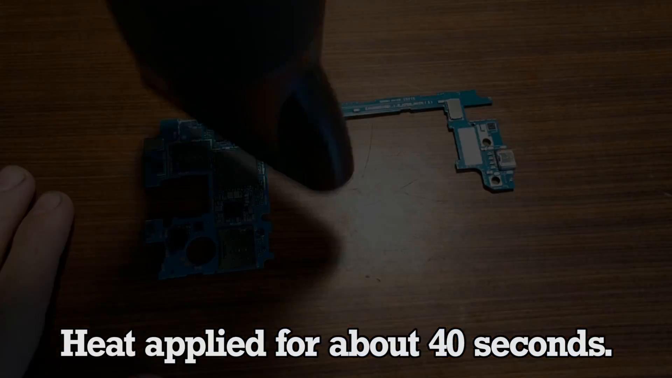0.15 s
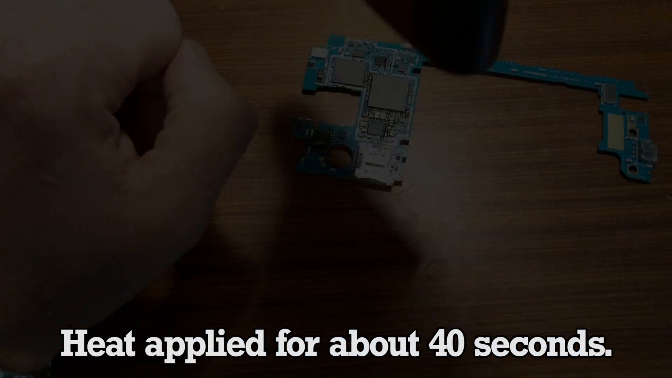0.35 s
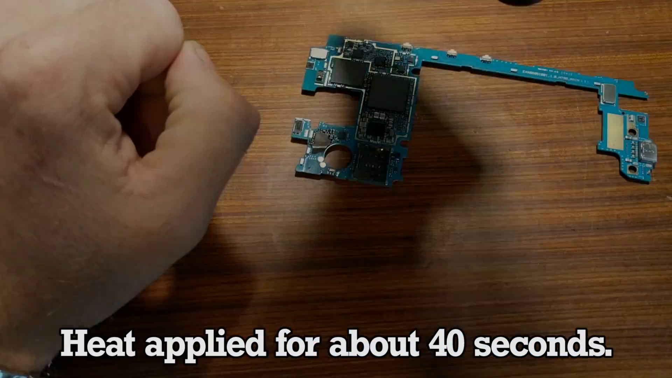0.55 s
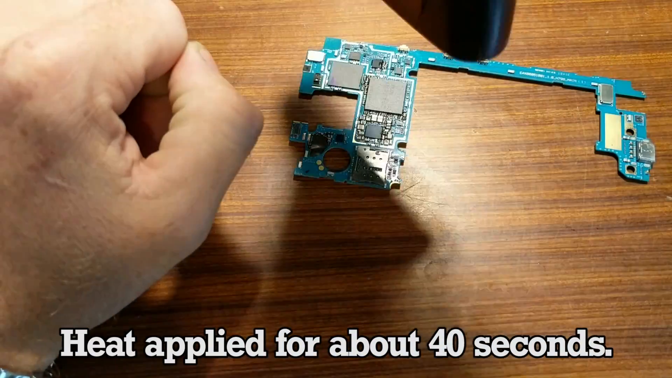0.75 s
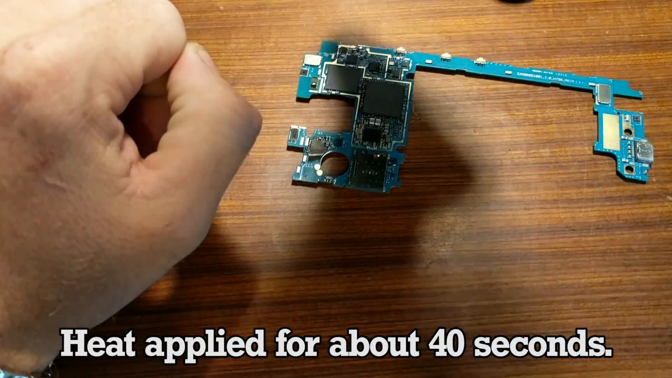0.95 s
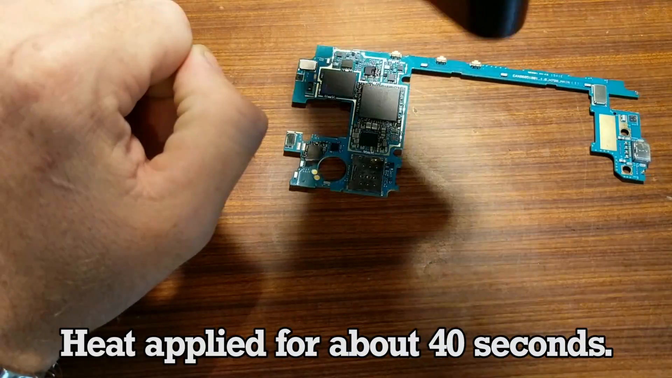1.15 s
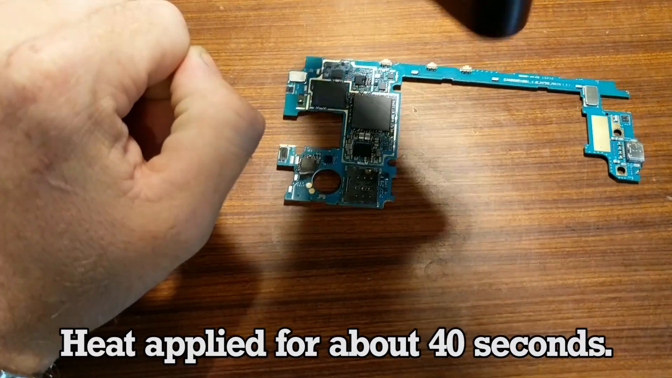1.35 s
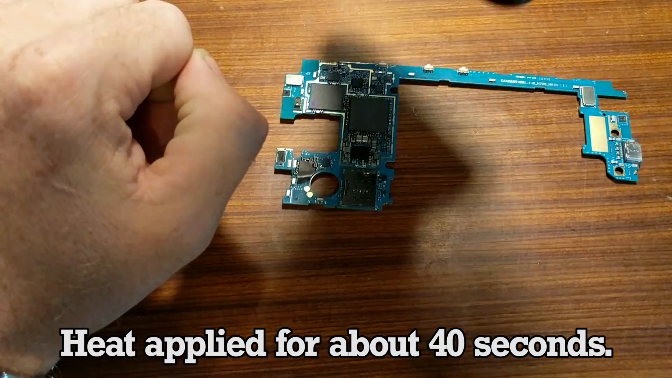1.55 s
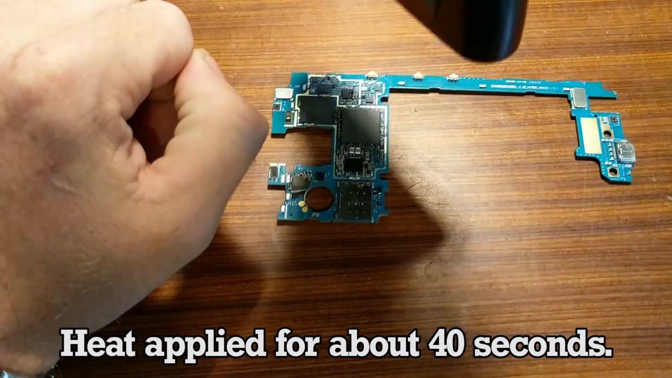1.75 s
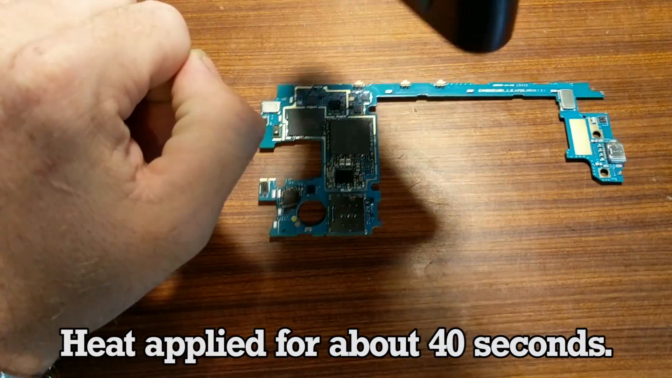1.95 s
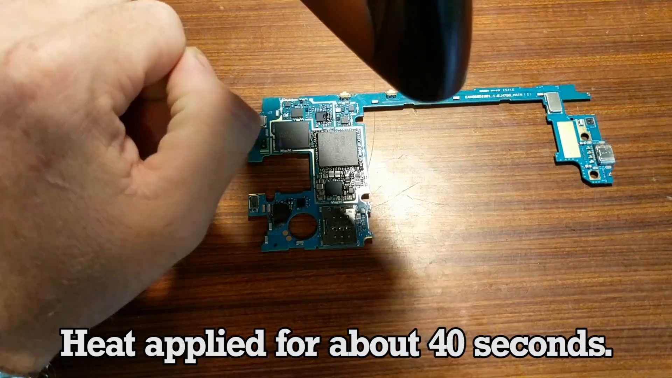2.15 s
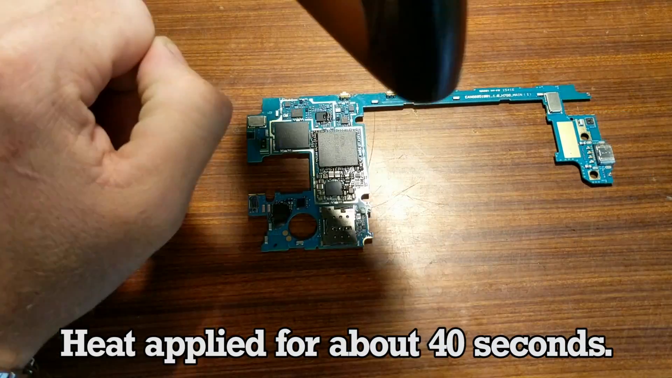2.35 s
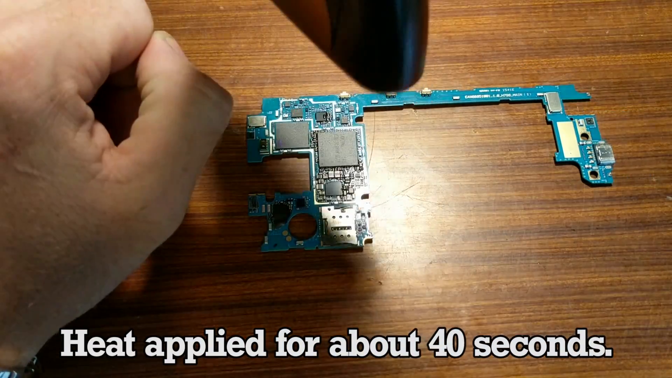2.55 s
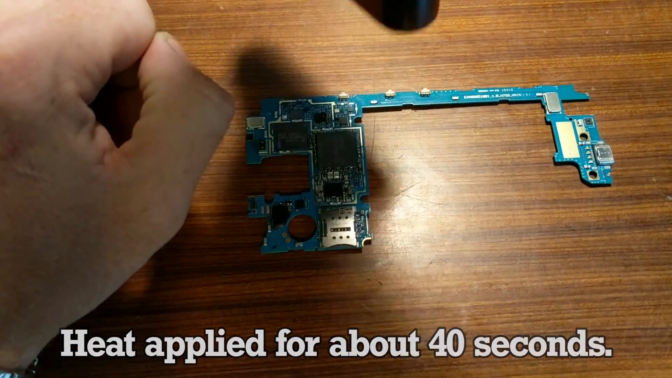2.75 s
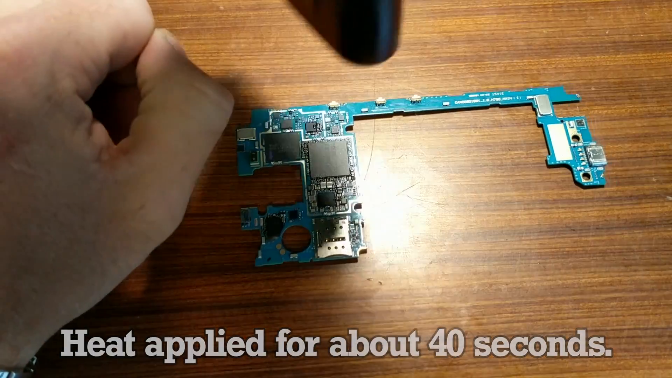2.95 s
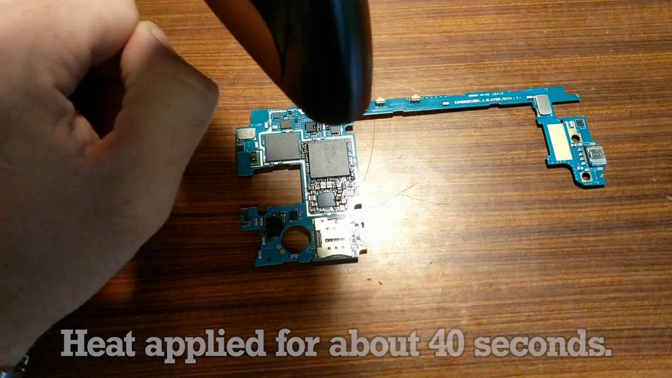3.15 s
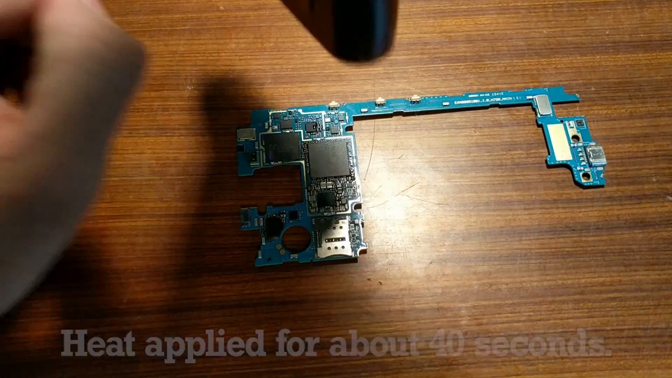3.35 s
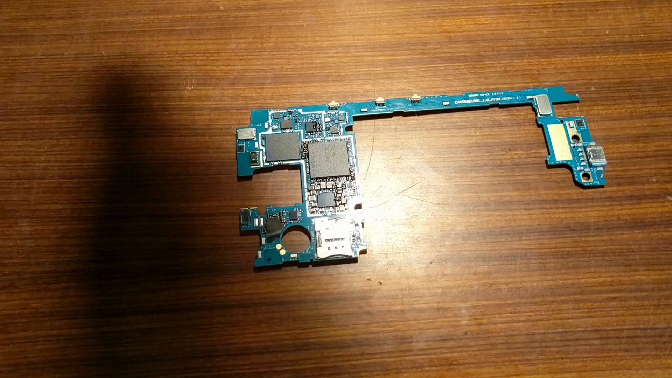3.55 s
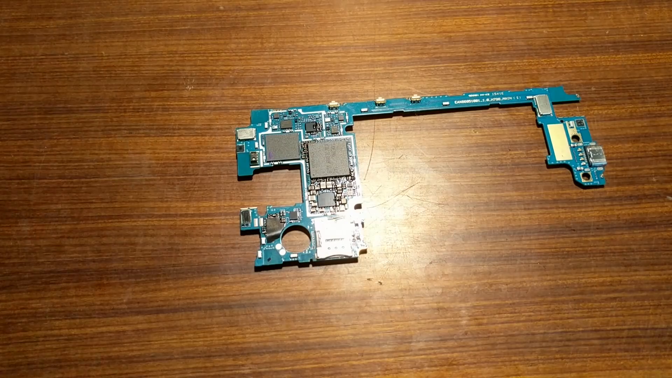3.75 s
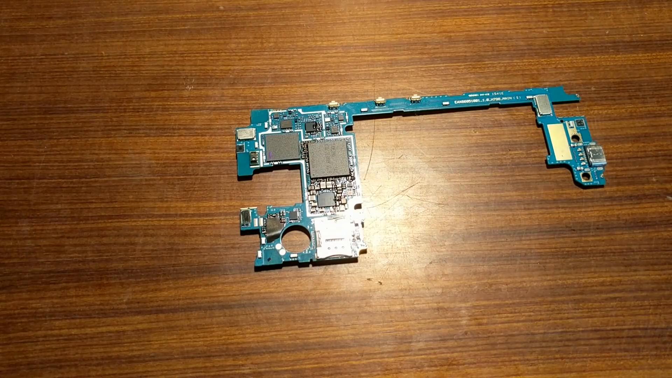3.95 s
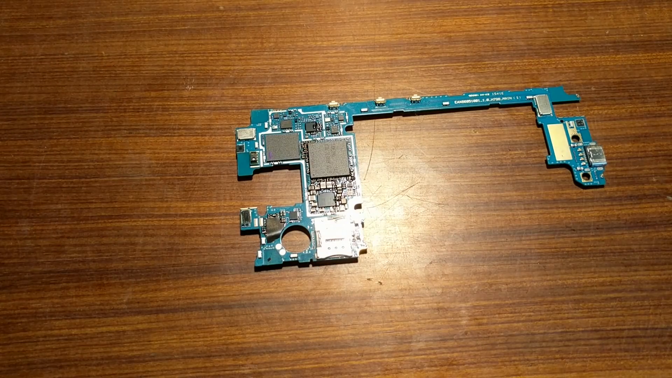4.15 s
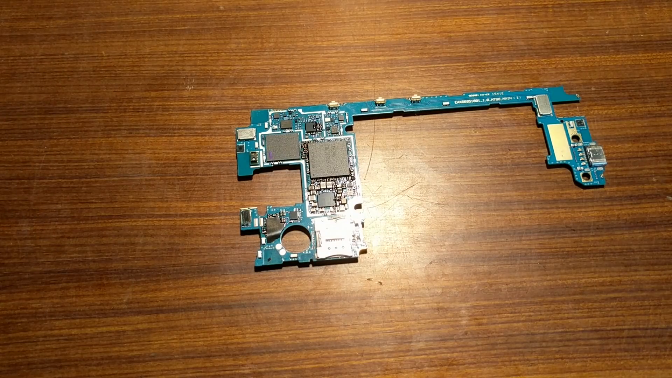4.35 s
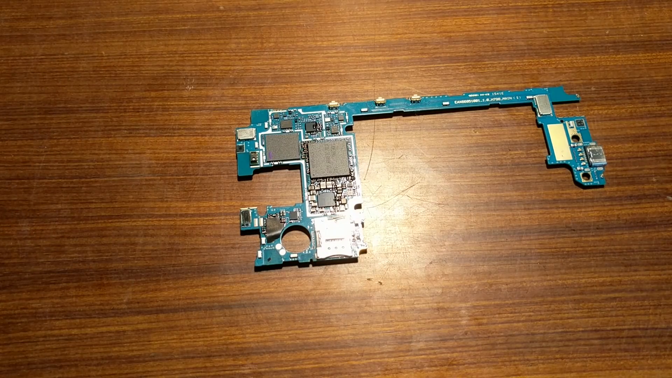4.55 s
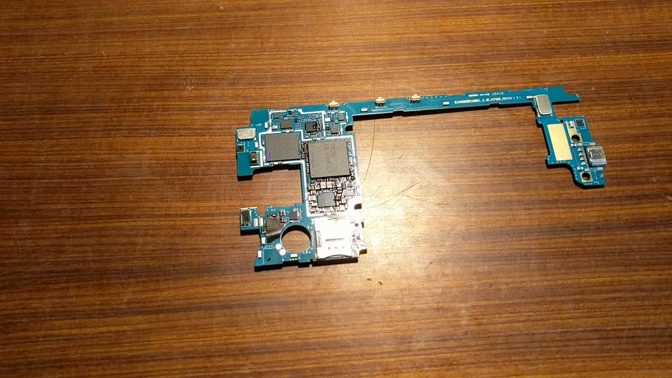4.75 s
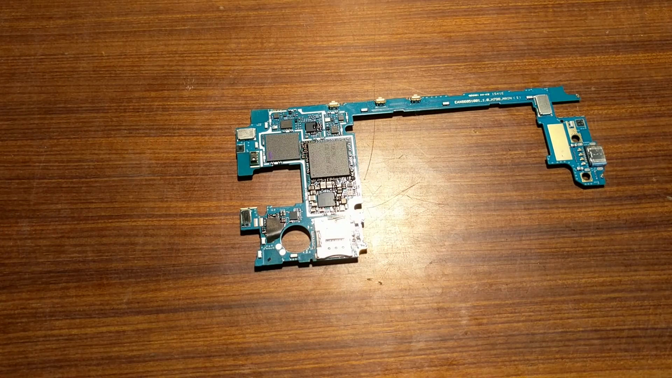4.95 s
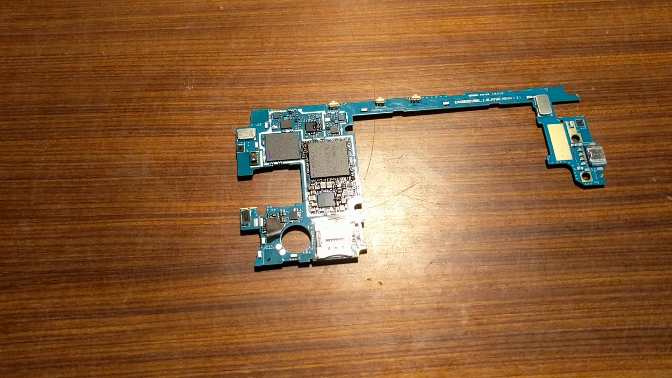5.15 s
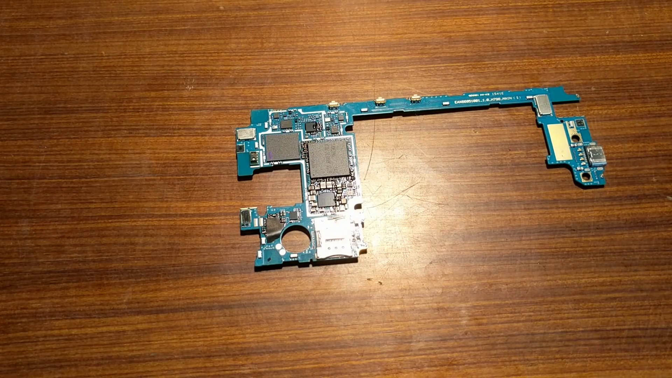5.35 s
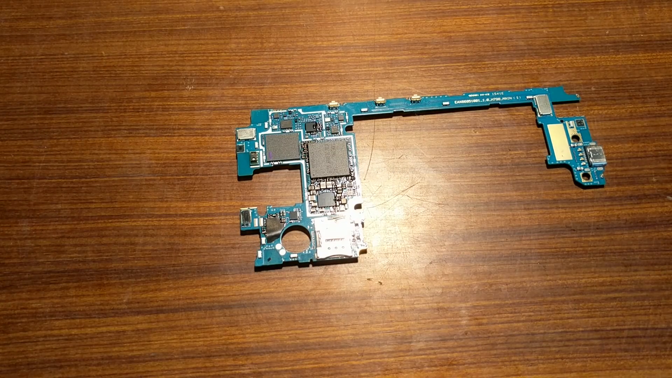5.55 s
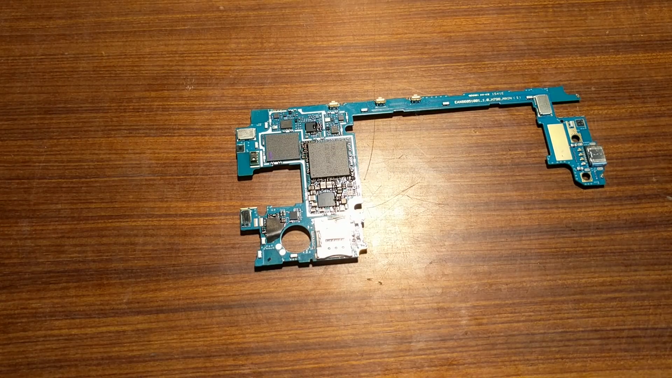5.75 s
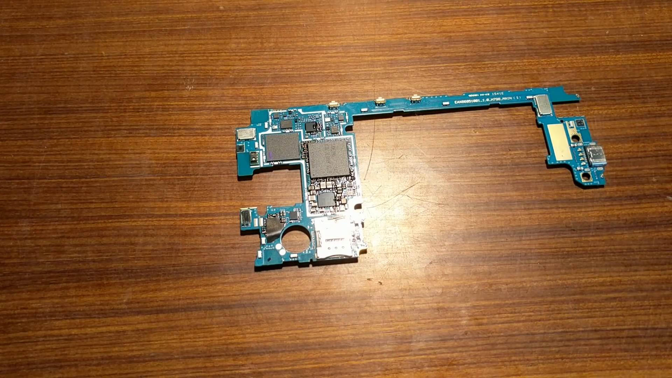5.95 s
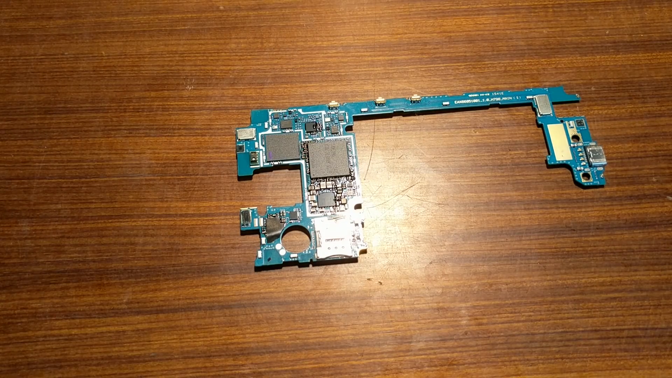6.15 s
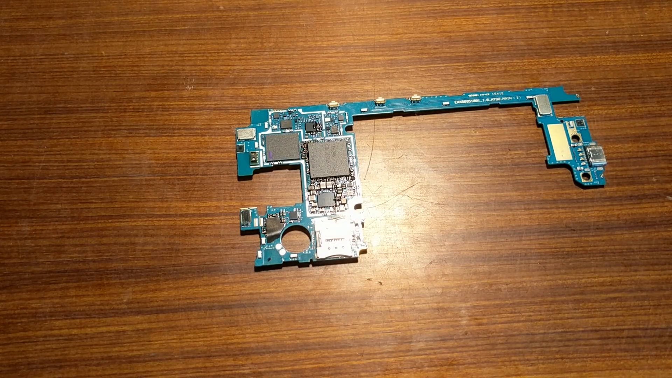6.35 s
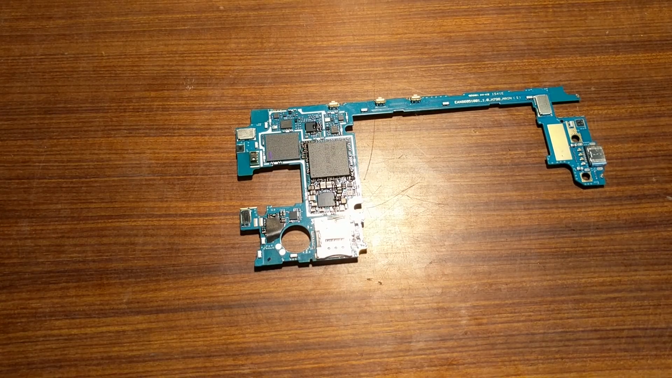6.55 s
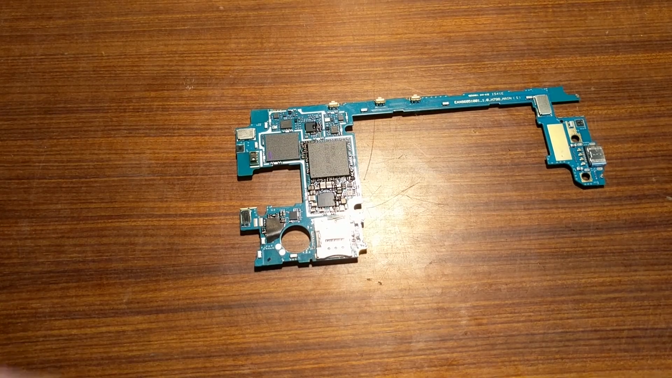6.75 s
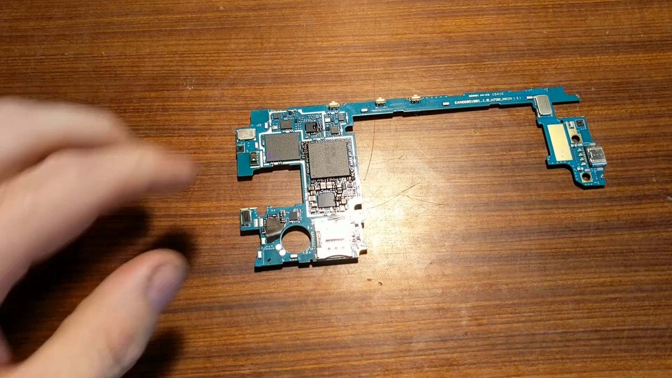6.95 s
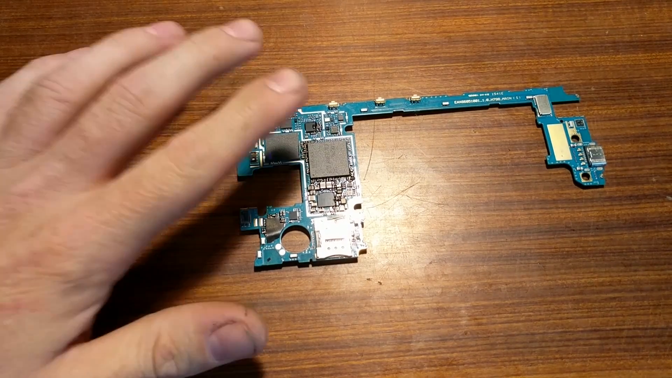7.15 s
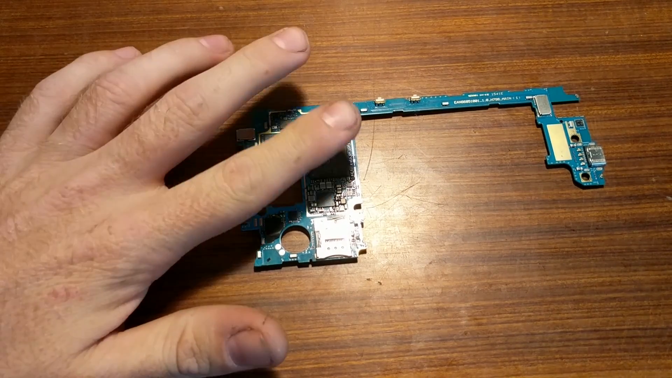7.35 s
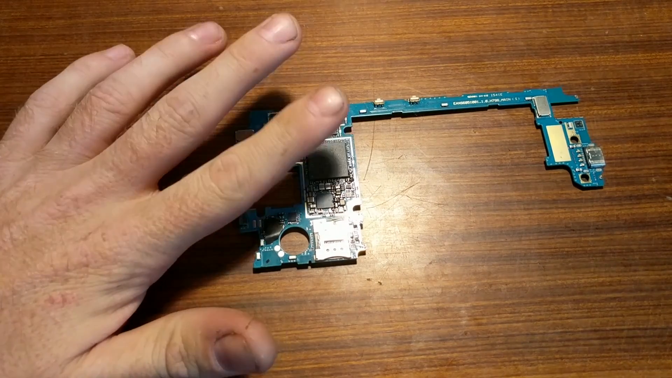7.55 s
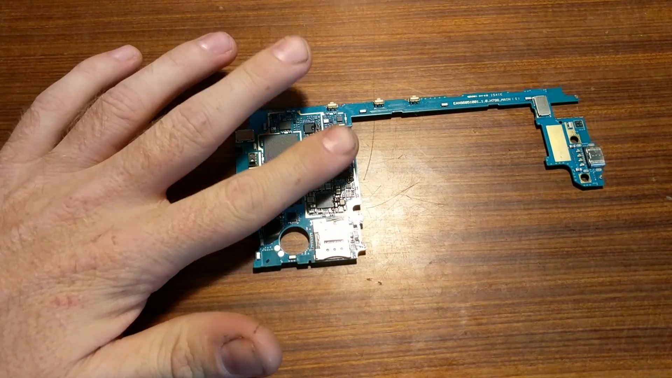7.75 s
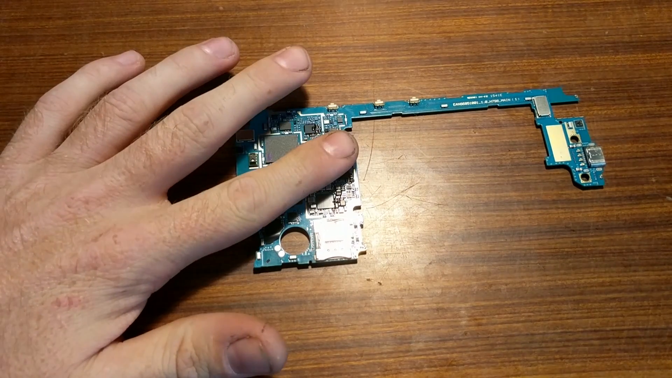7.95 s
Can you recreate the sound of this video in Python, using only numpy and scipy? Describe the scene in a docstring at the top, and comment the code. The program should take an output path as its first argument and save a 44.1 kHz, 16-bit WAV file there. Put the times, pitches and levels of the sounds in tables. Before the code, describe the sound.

In a quiet room, a heat gun roars close to the microphone, its airy rush shifting as it sweeps over a wooden desk, with a steady high whine. It swings away, drops to low speed, climbs to high, drops again and clicks off. The whine glides down and dies amid knocks. Objects then clack and scrape briefly on the desk, and fingers tap a small board, close and dry.

```python
"""A quiet room with a wooden desk: a heat gun with a six-blade fan is swept over the desk near a mono
microphone and pulled away. It is switched low, high, low and off, then coasts down.
Things knock and slide on the desk, and fingers tap a small board. The fan is shaped noise (air) plus
sine tones (blades, shaft); blows are noise bursts and ringing desk modes; slides are grainy noise.
Sparse random echoes and noise tails add the room."""
import sys
import numpy as np
from scipy import signal
from scipy.fft import rfft, irfft
from scipy.io import wavfile
from scipy.ndimage import uniform_filter1d

SR = 44100
rng = np.random.default_rng(int(sys.argv[2]) if len(sys.argv) > 2 else 0)


def materialize(psi):
    """Save the field psi as 16-bit PCM at rate SR to the path in sys.argv[1].

    A 1-D psi becomes a single channel; in a 2-D psi each row is a channel.
    """
    bounded = np.clip(np.atleast_2d(psi).T, -1, 1)
    quanta = np.round(bounded * 32767).astype(np.int16)
    wavfile.write(sys.argv[1], SR, quanta)


N = 353236


def gain_of(db):
    """Turn decibels into an amplitude factor."""
    return 10 ** (np.asarray(db) / 20)


def evened(x):
    """Scale to rms 1."""
    return x / np.sqrt(np.mean(x ** 2) + 1e-20)


def read(points, hz):
    """Read a curve of (f/Hz, value) points along a logarithmic pitch axis."""
    f, value = np.transpose(points)
    return np.interp(np.log(hz + 1), np.log(f + 1), value)


def columns(rows, t):
    """Read every column of a (t/s, ...) table at the times t."""
    s, *rest = np.transpose(rows)
    return [np.interp(t, s, column) for column in rest]


def add(mix, s, sound):
    """Mix a sound in, starting at s seconds."""
    part = mix[round(s * SR):][:len(sound)]
    part += sound[:len(part)]


def drift(top_hz):
    """Slow random wander of rms 1: sines with random starts, weaker toward top_hz."""
    t = np.arange(0, N + 100, 100) / SR
    slow = sum(np.sin(2 * np.pi * (f * t + rng.random())) / np.sqrt(f)
               for f in np.geomspace(top_hz / 30, top_hz, 24))
    return np.interp(np.arange(N) / SR, t, evened(slow))


def coloured(points, size):
    """Noise of rms 1 with a fixed spectrum."""
    spectrum = rfft(rng.standard_normal(size))
    colour_db = read(points, np.fft.rfftfreq(size, 1 / SR))
    return evened(irfft(spectrum * gain_of(colour_db), size))


def ring(x, hz, t60):
    """One vibration mode excited by x; left alone it drops 60 dB in t60 seconds."""
    r = np.exp(-np.log(1000) / (t60 * SR))
    turn = 2 * np.pi * hz / SR
    return signal.lfilter([np.sin(turn)], [1, -2 * r * np.cos(turn), r * r], x)


# room tone and microphone hiss: columns f/Hz, relative level/dB per Hz
FLOOR_COLOUR = [(30, -10), (53, -8.5), (84, -11.5), (120, -14.5), (335, -21.5), (1000, -25.5),
                (2050, -28.5), (4000, -38.5), (7500, -44.5), (11000, -45), (16000, -44)]
FLOOR_DB = -62
# faint rustle of sleeves: columns t/s, level/dB before a 4 dB cut
SLEEVE_RUSTLE = [(5.5, -70), (5.95, -62.5), (6.74, -61.5), (7.45, -67), (7.67, -76), (8.01, -75.5)]
# thin electronic whine: pitch, rms wander of that pitch, level
WHINE_HZ, WHINE_WANDER_HZ, WHINE_DB = 8295, 45, -80


def floor():
    """Steady noise of room and microphone, a rustle in the treble and a thin wavering whine."""
    wavering_hz = WHINE_HZ + WHINE_WANDER_HZ * drift(150)
    thin = np.sqrt(2) * np.sin(2 * np.pi * np.cumsum(wavering_hz) / SR) * gain_of(1.5 * drift(15))
    rustle_db = columns(SLEEVE_RUSTLE, np.arange(N) / SR)[0] - 4 + 1.5 * drift(40)
    rustle_colour = [(1500, -16.0), (3000, -3), (6000, -4.0), (10000, -6.0), (16000, -6)]
    rustle = gain_of(rustle_db) * coloured(rustle_colour, N)
    hiss = gain_of(FLOOR_DB + .8 * drift(5.1)) * coloured(FLOOR_COLOUR, N)
    return hiss + rustle + gain_of(WHINE_DB) * thin


# how long the room holds each pitch: columns f/Hz, time to drop 60 dB/s
ROOM_DECAY = [(120, .45), (400, 1), (1000, 0.83), (2500, 0.83), (6000, 0.36), (14000, 0.34)]


def room_decay(x):
    """Walls swallow each band at its own speed, so each band dies separately."""
    hz, t, z = signal.stft(x, SR, nperseg=256)
    fade = gain_of(-60 * t / read(ROOM_DECAY, hz)[:, None])
    return signal.istft(z * fade, SR, nperseg=256)[1]


def room(x):
    """Sparse echoes of random sign; three tails take turns, 1.7 rounds a second, so the echo keeps changing."""
    out, turn = np.zeros(N), 2 * np.pi * 1.7 * np.arange(N) / SR
    at = np.arange(300, SR - 20, 20)
    for k in range(3):
        echoes = np.zeros(SR)
        echoes[at + rng.integers(0, 20, len(at))] = rng.choice([-1., 1.], len(at))
        tail = room_decay(echoes)
        share = np.sqrt(2 / 3) * np.cos(turn + 2 * np.pi * k / 3)
        out += signal.fftconvolve(x * share, tail / np.linalg.norm(tail))[:N]
    return out


def afterglow(points):
    """Spread-out room tail after a blow: fresh noise, each band dying at its own speed, with a soft start."""
    tail = room_decay(coloured(points, 24576))
    return tail * np.clip(np.arange(len(tail)) / (0.0016 * SR), 0, 1)


# handling rumble while the gun is swung away
HANDLING_S, HANDLING_RISE_S, HANDLING_HOLD_S, HANDLING_FALL_S, HANDLING_DB = 3.27, .15, .35, .25, -48


def handling():
    """Low lumpy rumble from hand and cable, made of bass noise that swells and fades."""
    out = np.zeros(N)
    t = np.arange(0, HANDLING_RISE_S + HANDLING_HOLD_S + HANDLING_FALL_S, 1 / SR)
    swell = np.clip(np.minimum(t / HANDLING_RISE_S, (t[-1] - t) / HANDLING_FALL_S), 0, 1)
    rumble = coloured([(30, -12), (55, -1), (80, -17), (130, -31)], len(t))
    add(out, HANDLING_S, swell * gain_of(HANDLING_DB) * rumble)
    return out


# two swells of a faint tone: columns start t/s, rise/s, fall/s, top level/dB
TONE_SWELLS = [(5.49, 0.082, 0.22, -50.5), (6.01, .07, 0.16, -61)]
# it starts TONE_SLIDE_HZ too high and settles; start and end levels are against the top
TONE_HZ, TONE_SLIDE_HZ, TONE_SLIDE_S, TONE_RISE_DB, TONE_FALL_DB = 582, 120, .028, -18, -17


def tone():
    """A near-pure sine with soft ends that slides down to its pitch."""
    out = np.zeros(N)
    for s, rise, fall, peak_db in TONE_SWELLS:
        t = np.arange(0, rise + fall, 1 / SR)
        hz = TONE_HZ + TONE_SLIDE_HZ * np.exp(-t / TONE_SLIDE_S)
        db = peak_db + np.interp(t, (0, rise, rise + fall), (TONE_RISE_DB, 0, TONE_FALL_DB))
        sine = np.sqrt(2) * np.sin(2 * np.pi * np.cumsum(hz) / SR)
        add(out, s, gain_of(db) * sine * signal.windows.tukey(len(t), .2))
    return out


# things dragged over the desk: columns start t/s, length/s, rise/s, scrape level/dB, fade over the
# length/dB, desk drone level/dB, rumble level/dB, fine hiss level/dB
DRAGS = [(6.498, 0.084, .003, -50.5, -11, -56, -46.5, -47), (6.594, .16, 0.0021, -40, -37, -44.5, -53, -50),
         (7.118, 0.073, .002, -45.5, -11.5, -47, -68, -67), (7.149, 0.23, 0.034, -45, -26, -45, -60, -56),
         (7.505, .14, .003, -49.5, -26, -46.5, -57, -64)]
# colour of the scrape: columns f/Hz, relative level/dB per Hz
SCRAPE_COLOUR = [(320, -35), (550, -10), (636, 3), (684, -11), (736, -4), (1100, -4), (2040, -3),
                 (2480, -11), (2700, -9), (2940, -17), (5070, -13.5), (6950, -29), (10000, -31),
                 (13000, -59), (22000, -120)]
# the desk panel under a dragged load: columns f/Hz, relative level/dB, time to drop 60 dB/s
PANEL_MODES = [(324, 1.5, 0.35), (479, -2, .25), (269, -5.5, .2)]
HISS_FADE = 1.2  # the hiss fades this many times as fast as the scrape


def slides():
    """Grainy friction sets in and fades; the desk panel drones at its modes and rumbles below them."""
    out = np.zeros(N)
    rumble_colour = [(30, -23), (60, 8), (120, -9), (220, 1), (300, -29)]
    hiss_colour = [(9000, -28), (11000, -2), (13500, -7), (16000, -7)]
    for s, length, rise, scrape_db, fade_db, drone_db, rumble_db, hiss_db in DRAGS:
        t = np.arange(0, length, 1 / SR)
        fall_db, arch = fade_db * t / length, np.sin(np.pi * (t / length) ** 0.62)
        grain = gain_of(2.3 * evened(uniform_filter1d(rng.standard_normal(len(t)), size=60)))
        drone = sum(evened(ring(rng.standard_normal(len(t)), hz, t60)) * gain_of(db)
                    for hz, db, t60 in PANEL_MODES)
        sound = gain_of(scrape_db + fall_db) * evened(grain * coloured(SCRAPE_COLOUR, len(t)))
        sound += gain_of(drone_db + fall_db) * evened(drone)
        sound += gain_of(rumble_db) * arch * coloured(rumble_colour, len(t))
        sound += gain_of(hiss_db + HISS_FADE * fall_db) * evened(grain * coloured(hiss_colour, len(t)))
        add(out, s, sound * np.clip(np.minimum(t / rise, (length - t) / .004), 0, 1))
    return out


def struck(push, modes, centre_hz):
    """Modes rung by one push, peak 1; the spot that is hit favours the modes near centre_hz."""
    out = sum(gain_of(db - 12 * abs(np.log2(hz / centre_hz))) * ring(push, hz, t60)
              for hz, db, t60 in modes)
    return out / abs(out).max()


# knocks of the gun and other things, off to the side: columns t/s, relative crack level/dB,
# crack centre f/Hz, thud peak level/dB, thud centre f/Hz, relative treble level/dB
SIDE_KNOCKS = [(4.8584, -24, 1170, -37.5, 646, -32), (5.132, -31.5, 1140, -51, 659, -50),
               (5.5413, -33, 1640, -55, 595, -48), (5.679, -35, 1310, -41, 589, -67),
               (5.8929, -19.5, 3840, -52, 719, -35), (5.8988, -34.5, 1740, -31, 468, -43),
               (5.9084, -39, 2180, -59, 479, -39), (6.167, -44, 1280, -50, 748, -61),
               (6.1809, -38, 2500, -56, 589, -66.5), (6.4707, -54, 1230, -49, 743, -64),
               (6.4954, -41, 1820, -51, 525, -42), (6.5046, -31, 4530, -49.5, 420, -35),
               (6.5187, -34, 1810, -54, 498, -52), (6.5615, -33, 1250, -52, 721, -47),
               (6.5881, -22.5, 1250, -32, 704, -32.5), (6.6116, -25.5, 1600, -50, 371, -52),
               (6.8744, -45, 1040, -55, 371, -56), (7.1192, -36, 1380, -44, 476, -64)]
# finger taps on the board, close and dry: same columns
FINGER_TAPS = [(7.4824, -34, 1970, -27.5, 385, -38), (7.497, -18, 2000, -31, 326, -31.5),
               (7.5404, -34, 2030, -48, 326, -60), (7.8635, -38, 1000, -41, 404, -54),
               (7.8715, -24.5, 1900, -51, 385, -54), (7.8813, -33, 1860, -45, 412, -61)]
# the desk top, then the whole desk on its legs: columns f/Hz, relative level/dB, time to drop 60 dB/s
DESK_MODES = [(340, 7.5, 0.037), (439, 14, 0.043), (640, -20, 0.062), (1220, 13, 0.039)]
LEG_MODES = [(78.4, 0, 0.1), (173, -8, .08)]
# colour of the crack: columns f/Hz, relative level/dB per Hz
CRACK_COLOUR = [(700, -2), (1200, -4), (2000, 2), (3500, -2.5), (5000, 0.5), (6500, -3.5), (8000, -15)]
# crack's time to drop 60 dB (s), low bump against the thud (dB), room share at crack level -34 (dB)
KNOCK_FEEL, TAP_FEEL = (0.043, -30, -8.5), (0.05, -12, -23)
RING_WIDTH_HZ, RING_DB = 350, 10  # each crack's colour is boosted around its centre
# louder blows are nearer, so their room share is smaller (dB per dB of crack)
BLOW_RISE_S, DRIER_PER_DB = 0.00096, -0.2539


def knocks():
    """Each blow: a crackling burst with a treble edge, a push that rings the desk, and the room's answer."""
    out, t = np.zeros(N), np.arange(8192) / SR
    edge = [(6000, -19), (8000, 0), (12000, -7.0), (16000, -3.5)]
    thud_colour = [(150, -20), (300, -18), (700, 11), (1100, -14)]
    # sound follows the change of force
    quick_push = np.gradient(t * np.exp(-t / 0.00026))
    slow_push = np.gradient(t * np.exp(-t / 0.0036))
    rows = [(*row, *KNOCK_FEEL) for row in SIDE_KNOCKS] + [(*row, *TAP_FEEL) for row in FINGER_TAPS]
    for s, crack_db, crack_hz, thud_db, thud_hz, treble_db, t60, bump_db, room_db in rows:
        room_db += DRIER_PER_DB * (crack_db + 34)
        hz = np.geomspace(600, 9000, num=60)
        boost_db = RING_DB / (1 + (2 * (hz - crack_hz) / RING_WIDTH_HZ) ** 2)
        colour = np.transpose([hz, read(CRACK_COLOUR, hz) + boost_db])
        # many small contacts
        grit = gain_of(3.8 * evened(uniform_filter1d(rng.standard_normal(len(t)), size=30)))
        fall_db = -60 * np.maximum(t - BLOW_RISE_S, 0) / t60
        shape = np.clip(t / BLOW_RISE_S, 0, 1) * evened(grit)
        blow = shape * gain_of(crack_db - 11.0 + fall_db) * coloured(colour, len(t))
        blow += shape * gain_of(treble_db + 3.2 * fall_db) * coloured(edge, len(t))  # treble dies sooner
        blow += gain_of(thud_db) * struck(quick_push, DESK_MODES, thud_hz)
        blow += gain_of(thud_db + bump_db) * struck(slow_push, LEG_MODES, centre_hz=100)
        add(out, s, blow)
        add(out, s, gain_of(crack_db - 13.5 + room_db) * afterglow(colour))
        add(out, s, gain_of(treble_db - 5.0 + room_db) * afterglow(edge))
        add(out, s, gain_of(thud_db - 19 + room_db) * afterglow(thud_colour))
    return out


BLADES, FULL_HZ, START_HZ = 6, 1472, 1475  # fan blades, blade tone taken as full speed, blade tone at first
# each move of the switch sends the blade tone toward a new pitch: columns t/s, f/Hz, time constant/s
SWITCH_MOVES = [(0, 1468, 2.6), (3.4515, 1078, .1654), (3.804, 1466.5, .1357), (4.7204, 1078, .1654)]
OFF_S, STOP_S = 4.848, 5.85  # power off; the fan falls silent
# coasting: pitch falls by AIR_DRAG x Hz squared + BEARING_DRAG x Hz a second
AIR_DRAG, BEARING_DRAG = .00144, .829


def settle(t):
    """Blade tone in Hz as the motor nears each goal, then coasts; and the share of speed still to gain."""
    hz, goal = np.full(len(t), START_HZ * 1.), np.zeros(len(t))
    for s, goal_hz, lag in SWITCH_MOVES:
        gap_hz = (np.interp(s, t, hz) - goal_hz) * np.exp(-np.maximum(t - s, 0) / lag)
        hz = np.where(t >= s, goal_hz + gap_hz, hz)
        goal[t >= s] = goal_hz
    ratio = AIR_DRAG / BEARING_DRAG
    slowing = np.exp(BEARING_DRAG * np.maximum(t - OFF_S, 0))
    coast = 1 / ((1 / np.interp(OFF_S, t, hz) + ratio) * slowing - ratio)
    return np.where(t >= OFF_S, coast, hz), np.maximum(1 - hz / goal, 0)


# each swing dips the gun toward the desk: columns lowest point t/s, depth (1 = a full dip)
DIPS = [(.27, .8), (.62, 1), (.98, 1), (1.33, 1), (1.7, 1), (1.98, .85), (2.87, 1.1), (3.42, .25)]
SWING_S, COMB_HZ, DIP_HZ = .36, 2570, 400  # length of a swing, comb spacing when raised, its rise at full depth
# echo strength (0-1) when raised, what a full dip adds, and how long it takes to set in
ECHO_RAISED, ECHO_DIP, ECHO_RISE_S = .38, .16, .4


def echo_of(t, away):
    """The rush bounces between desk and gun: comb spacing in Hz and echo strength, both raised by a dip."""
    dip = sum(depth * np.cos(np.pi * np.clip((t - s) / SWING_S, -.5, .5)) ** 1.3 for s, depth in DIPS)
    strength = (ECHO_RAISED + ECHO_DIP * dip) * np.clip(t / ECHO_RISE_S, 0, 1)
    return COMB_HZ + DIP_HZ * dip, strength * (1 - np.clip(away, 0, 1))


# how far the nozzle has turned from the microphone: columns t/s, turn (0-1)
TURNED_AWAY = [(0, 0.22), (3.4, 0.24), (3.6, 1), (3.8, 1), (8.1, 1)]
# the air stream at the microphone: columns t/s, rush level/dB, treble hiss level/dB (both relative)
AIR_LEVEL = [(0.0, -26, -32), (0.1, -26.5, -32), (1.9, -26.5, -33.5), (3.1, -26.5, -35),
             (3.42, -26.5, -33.5), (3.47, -28, -37), (3.55, -28.5, -39), (3.7, -33.5, -43),
             (3.84, -35.5, -42.5), (3.91, -33.5, -43.5), (4.72, -34, -41), (4.87, -36.5, -46),
             (5.08, -44.5, -58.5), (5.16, -50.5, -68), (5.41, -65, -77), (5.6, -66, -85),
             (5.85, -74.5, -86)]
# colour of the rush, near and turned away: columns f/Hz, relative level/dB per Hz
NEAR_COLOUR = [(30, -26), (60, -28.5), (130, -22.5), (300, -19), (800, -11.5), (1400, -15.5), (2000, -14.5),
               (3000, -22), (4500, -23), (7000, -24), (10000, -25.5), (14000, -28.5), (16000, -29.5)]
AWAY_COLOUR = [(30, -40), (60, -43), (130, -22), (300, -22), (700, -23), (1200, -12.5), (2000, -14),
               (3000, -22), (5300, -23.5), (8000, -23.5), (12000, -28), (16000, -32)]
# resonances of barrel and desk, near and turned away: columns f/Hz, width/Hz, boost or cut level/dB
NEAR_PEAKS = [(150, 11, 2), (483, 14, 8.5), (590, 69, -5.5), (817, 76, 3.5), (935, 55, -3.5), (1036, 55, 7),
              (1112, 120, -8.5), (1437, 200, -6), (1767, 140, 4.5), (2014, 68, -12.5), (2010, 60, 0.5),
              (2186, 140, -8.5), (2604, 390, 4.5), (2904, 200, 6), (3190, 200, -3), (3500, 150, 8),
              (4010, 250, -7.5), (4400, 300, -1), (4860, 150, -15)]
AWAY_PEAKS = [(447.4, 23, 16.5), (643, 210, 12.5), (875, 100, -2), (1075, 71, 3), (1775, 300, -2),
              (2200, 220, -1), (2590, 220, -4), (2710, 190, 7.5), (3220, 180, -2.5), (3570, 270, 3)]
# for the first moments the fan is duller in the upper middle, with more shaft hum
OPENING_S, DULL_HZ, DULL_WIDTH_HZ, DULL_DB, OPENING_HUM_DB = 0.35, 3200.5, 2000, -4, 2
# the bounce works between these pitches and turns the phase by this share of a cycle
MIRROR_LOW_HZ, MIRROR_HIGH_HZ, MIRROR_TURN = 5500, 11300, .39


def rush():
    """Turbulent air in the barrel resonances, combed by the desk echo, duller as the fan slows."""
    frames, hz = N // 256 + 5, np.fft.rfftfreq(1024, 1 / SR)
    t = np.arange(frames) * 256 / SR
    blade_hz = settle(t)[0]
    air_db, hiss_db = columns(AIR_LEVEL, t)
    (away,) = columns(TURNED_AWAY, t)
    spacing_hz, echo = echo_of(t, away)
    near, far = (read(base, hz) + sum(db / (1 + (2 * (hz - f) / w) ** 2) for f, w, db in peaks)
                 for base, peaks in ((NEAR_COLOUR, NEAR_PEAKS), (AWAY_COLOUR, AWAY_PEAKS)))
    shape_db = np.outer(near, 1 - away) + np.outer(far, away)
    # slow air has less treble
    shape_db += 2.0 * np.outer(np.log2((hz + 100) / 3000), np.log2(blade_hz / FULL_HZ))
    dull_db = DULL_DB / (1 + (2 * (hz - DULL_HZ) / DULL_WIDTH_HZ) ** 4)
    shape_db += np.outer(dull_db, np.clip((OPENING_S - t) / .15, 0, 1))
    # small surfaces miss long waves and scatter the shortest, so the comb lives in the middle treble
    mirror = 1 / (1 + (MIRROR_LOW_HZ / (hz + 1)) ** 8) / (1 + (hz / MIRROR_HIGH_HZ) ** 8)
    bounce = np.outer(mirror, echo) * np.exp(-2j * np.pi * (hz[:, None] / spacing_hz - MIRROR_TURN))
    shape = gain_of(shape_db) / abs(1 - bounce)
    band = (hz > 1550) & (hz < 6000)  # the rush level is set in this band
    shape *= gain_of(air_db) / np.sqrt((shape[band] ** 2).sum(0))
    # treble is a narrow beam from the nozzle, so it has a level of its own
    treble, share = hz > 6500, np.clip((hz[:, None] - 5000) / 3000, 0, 1)
    shape *= (gain_of(hiss_db) / np.sqrt((shape[treble] ** 2).sum(0))) ** share
    a, b, patches = rng.standard_normal((frames, 513, 3)).T
    # gusts: random louder and softer patches across pitch and time
    patches = evened(uniform_filter1d(uniform_filter1d(patches, size=10, axis=0), size=10, axis=1))
    gusts = gain_of((0.96 + 0.77 * away) * patches + 0.5)
    z = (a + 1j * b) * shape * gusts * (t < STOP_S)
    return signal.istft(z, nperseg=1024, noverlap=768)[1][:N]


# the blade tone's level, shaped by barrel and room: columns f/Hz, level/dB before aim, pull and flutter
BLADE_LEVEL = [(240, -68.5), (340, -64), (410, -57), (455, -38), (490, -46), (570, -51), (630, -34.5),
               (700, -36), (745, -38.5), (785, -31.5), (880, -50), (970, -39), (1060, -30.5), (1140, -32),
               (1250, -28), (1340, -26), (1385, -31), (1420, -25), (1470, -22)]
# the blade tone swells with the aim of the nozzle: columns t/s, added level/dB
NOZZLE_AIM = [(0, 4.5), (.05, 7), (.45, 1.5), (.93, -1), (1.24, 0), (1.32, -2), (1.53, 2), (1.71, -1.5),
              (2.26, 1.5), (2.36, -0.5), (2.66, 3), (3.13, 0), (3.24, -1.5), (3.44, 1), (3.5, -0.5),
              (3.65, -2.5), (3.8, -4), (4.1, 4.5), (4.16, -3), (4.23, 1), (4.42, -3), (4.7, -1)]
# other tones of the shaft: columns multiple of shaft speed, level/dB near, level/dB turned away
# (against the air rush, at full speed)
SHAFT_TONES = [(1, -10.5, -11.5), (4, -32, -17.5), (5, -16.5, -9), (12, -14, -21.5), (18, -34.5, -35.5),
               (20, -43.5, -44), (35, -38.5, -46), (50, -33.5, -38.5)]
# rectified mains in the powered motor: columns f/Hz, level/dB near, level/dB turned away
# (against the air rush, at full speed)
MAINS_HUM = [(99, -25, -29)]
PULL_DB = 16  # added while the motor pulls up to speed, per share of speed still missing
FLUTTER_DB = 2  # the tone flutters while its pitch slides through the room's modes, less when the motor pulls


def whine():
    """Blade-passing tone and other shaft tones, locked to one slightly wavering speed, plus mains hum."""
    t = np.arange(N) / SR
    blade_hz, missing = settle(t)
    air_db = columns(AIR_LEVEL, t)[0]
    (away,) = columns(TURNED_AWAY, t)
    flutter_band = signal.butter(2, (12, 45), "band", fs=SR, output="sos")
    flutter = evened(signal.sosfilt(flutter_band, rng.standard_normal(N)))
    sliding = np.clip(abs(np.gradient(np.log(blade_hz))) * SR / .3, 0, 1)
    blade_db = read(BLADE_LEVEL, blade_hz) + columns(NOZZLE_AIM, t)[0] + PULL_DB * missing
    blade_db += FLUTTER_DB * sliding * flutter * np.exp(-missing / 0.061)
    turns = np.cumsum(blade_hz / BLADES * (1 + 0.00027 * drift(25))) / SR
    out = gain_of(blade_db + 0.27 * drift(60)) * np.sin(2 * np.pi * BLADES * turns)
    for multiple, near_db, away_db in SHAFT_TONES:
        level_db = air_db + near_db + away * (away_db - near_db) + 1.7 * drift(30)
        level_db += OPENING_HUM_DB * np.clip((OPENING_S - t) / .15, 0, 1)
        level_db += 12 * np.log2(blade_hz / FULL_HZ)  # unbalance shakes far less at low speed
        out += gain_of(level_db) * np.sin(2 * np.pi * (round(multiple) * turns + rng.random()))
    powered = uniform_filter1d((t < OFF_S) * (blade_hz / FULL_HZ) ** 3, size=800)
    for hz, near_db, away_db in MAINS_HUM:
        level_db = air_db + near_db + away * (away_db - near_db) + 1.5 * drift(25)
        out += powered * gain_of(level_db) * np.sin(2 * np.pi * hz * t)
    return np.sqrt(2) * out * np.clip((STOP_S - t) / .05, 0, 1)


TONES_WET_DB = (-21, -13)  # room share of the fan's tones, near and turned away


def scene():
    """All layers summed; the fan also sounds through the room; both channels carry the same sound."""
    air, tones = rush(), whine()
    tones_wet_db = np.interp(columns(TURNED_AWAY, np.arange(N) / SR)[0], (0, 1), TONES_WET_DB)
    wet = room(gain_of(-12.0) * air + gain_of(tones_wet_db) * tones)
    mono = floor() + wet + handling() + tone() + slides() + knocks() + air + tones
    return np.array([mono, mono])


EDGE_HZ = 15800  # top of the band


def record(dry):
    """The microphone's bass cut below 42 Hz, then the treble limit."""
    cut = signal.sosfilt(signal.butter(4, 42, "high", fs=SR, output="sos"), dry)
    limit = signal.firwin(511, EDGE_HZ, window=("kaiser", 7), fs=SR)
    return signal.oaconvolve(cut, limit[None], "same")


dry = scene()
out = record(dry)
materialize(out)
```